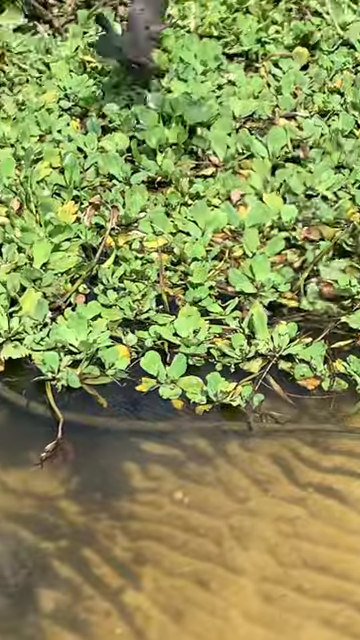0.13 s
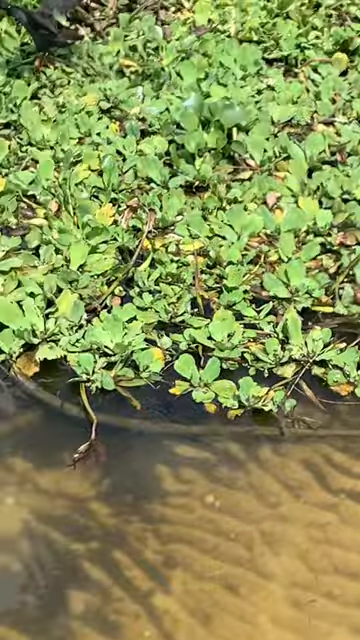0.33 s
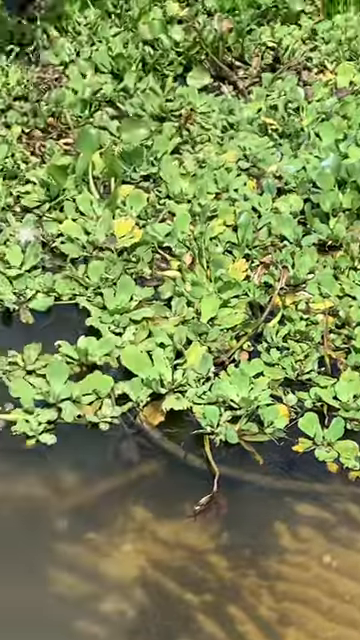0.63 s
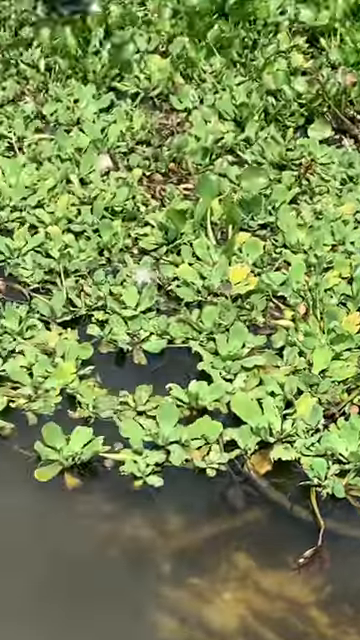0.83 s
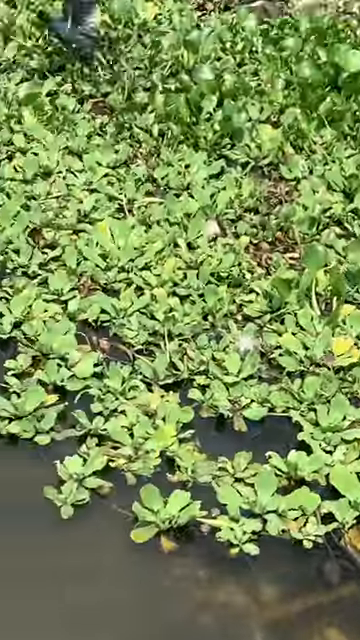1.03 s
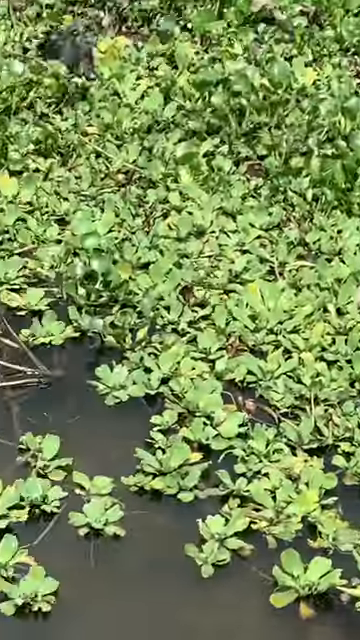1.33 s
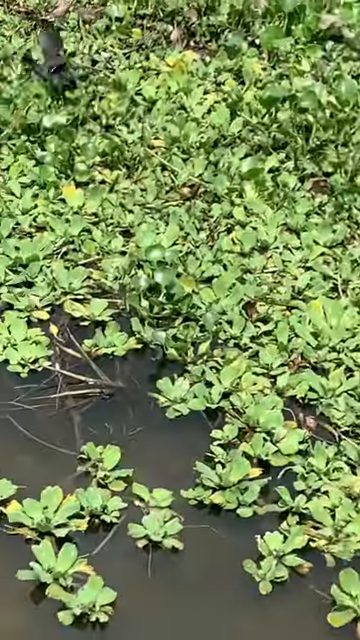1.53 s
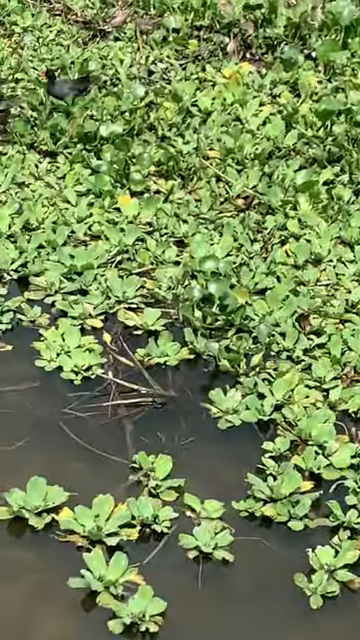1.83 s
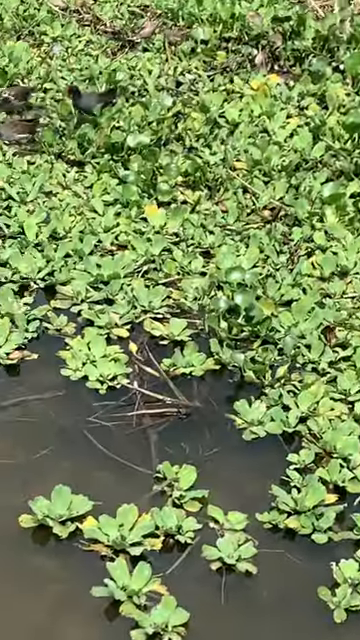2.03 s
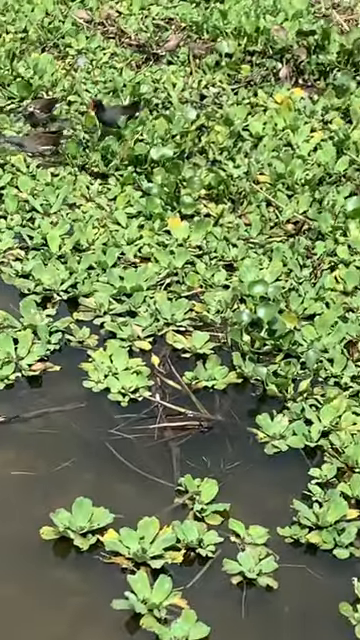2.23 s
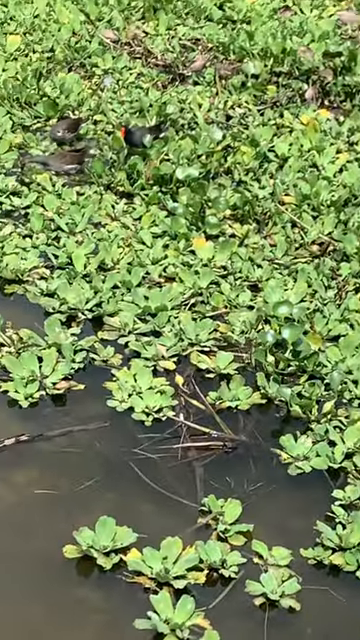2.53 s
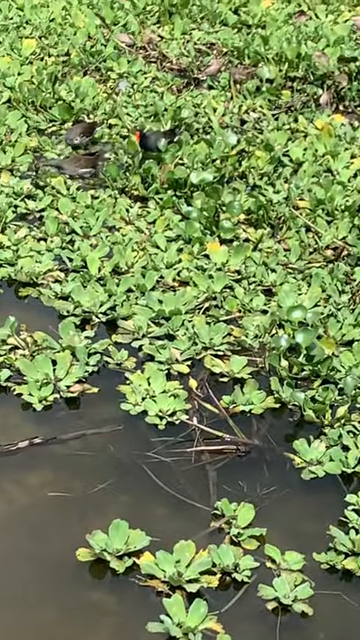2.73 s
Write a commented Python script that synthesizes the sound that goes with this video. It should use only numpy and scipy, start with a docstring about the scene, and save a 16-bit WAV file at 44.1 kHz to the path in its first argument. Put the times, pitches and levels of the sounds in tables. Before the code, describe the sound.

A moorhen gives about eight short, falling, nasal clucks, then four harsh squawks, mostly stuttering. Two tiny leaf snaps and a thin buzz sit between, over low rumble and distant engines; open pond, small stereo microphone.

```python
"""A low rumble cuts in, and at once moorhens on a weedy pond cluck: falling notes built from harmonics.
Then come four harsh squawks, all but one broken into stuttering bursts of voice and hiss.
Leaves snap twice (short noise clicks), a thin pulsed buzz comes and goes, a small bird whistles faintly.
Two distant engines, made of a few low tones each, drone underneath; one of them gains speed overall."""
import sys
import numpy as np
from scipy import signal
from scipy.fft import rfft, irfft, next_fast_len
from scipy.io import wavfile
from scipy.ndimage import map_coordinates

SR = 44100
rng = np.random.default_rng(int(sys.argv[2]) if len(sys.argv) > 2 else 0)


def put_to_file(sound):
    """Save the sound as 16-bit audio at rate SR, in the file named by the first command-line argument."""
    columns = np.atleast_2d(sound).T  # one column per channel
    safe = np.clip(columns, -1, 1)
    whole_steps = np.round(safe * 32767)
    wavfile.write(sys.argv[1], SR, whole_steps.astype(np.int16))


N = 127890

# Clucks: start_s, length_s, starting pitch_hz, fall (share of pitch), starting level_db,
# third_harmonic_db, upper_harmonics_db, rasp_db
CLUCKS = [(0.091, 0.033, 787.6, 0.22, -20, -20.5, -20.5, -31),
          (0.264, 0.038, 768.6, 0.197, -19.5, -27, -21.5, -31),
          (0.473, .041, 711, 0.198, -26.5, -14, -16, -32.5),
          (.675, 0.0068, 637.4, .1, -38.5, -22, -8.5, -55), (.71, 0.054, 722, 0.171, -29, -9, -10, -33.5),
          (0.925, 0.052, 715, 0.184, -32, -3.5, -9, -47), (1.186, .025, 659, 0.23, -34, -16, -13, -40.5),
          (1.416, 0.068, 751.6, 0.25, -28.5, -2, -2.5, -41)]
CLUCK_ATTACK_S, CLUCK_RELEASE_S, CLUCK_FADE_DB_PER_S = .0049, 0.0024, 231
# As a cluck sags, its upper harmonics fade and its pitch gets shakier
SAG_POWER, SAG_S, UPPER_FADE_DB, TAIL_FRAY = 3.2, .04, 6, 3
FUNDAMENTAL_DB = -17  # compared with the second harmonic
BREATH_DB = -11  # breath noise, compared with the upper harmonics
# Random unsteadiness: pitch (share), level (dB), upper-harmonic phase (radians per harmonic number)
CLUCK_JITTER, CLUCK_SHIMMER_DB, CLUCK_SMEAR = .003, 1.0, .075
# Tone colour of a cluck's upper harmonics and breath: frequency_hz, level_db
UPPER = [(2900, -2.5), (3600, -7), (4300, -18), (5000, -6.5), (7000, -28.5), (9000, -18), (10100, -14.5),
         (15000, -38.5)]
# Tone colour of the rasp: frequency_hz, level_db
RASP = [(400, -37), (750, -17.5), (1300, -7), (1650, -13), (1950, -19.5), (4500, -37.5), (15000, -45)]
# The rasp builds up before a cluck, drops as the note starts, and returns around its end
RASP_LEAD_S, RASP_LEAD_DB, RASP_TAIL_S, RASP_UNDER_DB = 0.026, -2.5, 0.0089, -22
# The throat rings briefly around the moment a cluck breaks off; level compared with the rasp
THROAT_HZ, THROAT_DB, THROAT_S = 1592, -0.5, 0.0029

# Throat setting of each squawk: middle_s, pitch_hz, bill_resonance_hz, bill_boost_db, low_body_db,
# noise_share (0 to 1)
SQUAWKS = [(1.88, 737.6, 2800, 5, -0.5, 0.2), (2.23, 1058, 4200, 6.5, 2, 0.2),
           (2.61, 653, 3800, 2, 2.5, 0.2), (2.75, 736, 3900, 8, 5.5, 0.23)]
# Tone colour of the open bill: frequency_hz, level_db
HARSH = [(700, 1), (1450, -6), (1800, -23.5), (2200, -6.5), (3000, 0.5), (3600, -7), (4300, -0.5),
         (5300, -3), (6100, -21), (7100, -20), (9000, -14), (11500, -22), (15000, -26.5)]
# Bursts that make up the squawks: start_s, length_s, level_db
BURSTS = [(1.862, .027, -33), (1.893, .0096, -35), (2.238, 0.019, -37.5), (2.59, .006, -32.5),
          (2.601, .011, -30.5), (2.612, 0.0093, -31), (2.626, 0.0087, -33), (2.713, .005, -37),
          (2.732, 0.0055, -39), (2.737, 0.0098, -30.5), (2.748, .01, -30.5), (2.758, .02, -29),
          (2.78, .0096, -29.5)]
SQUAWK_SPAN_S = .06  # bursts starting this near a squawk's middle belong to it
SQUAWK_EDGE_S, BILL_WIDTH_HZ, BODY_HZ, SQUAWK_JITTER = 0.0037, 600, 1100, .01
# Air hissing through the bill around each burst; level compared with the burst
SQUAWK_HISS_DB, SQUAWK_HISS_LEAD_S, SQUAWK_HISS_TAIL_S = -11.5, 0.027, 0.0089

# Leaf snaps: start_s, level_db
SNAPS = [(1.0893, -33), (1.1288, -24)]
# Tone colour of the snaps: frequency_hz, level_db
SNAP_COLOUR = [(800, -12), (4500, -1), (12700, 1), (15000, -7)]
SNAP_DECAY_S, SNAP_TAIL_DB, SNAP_TAIL_S = .001, -20, .008

# Swells of the rattle: peak_s, rise_s, fall_s, level_db before pulsing, average pulses_per_s
RATTLES = [(0.284, 0.067, 0.064, -47.5, 104), (.47, 0.095, 0.1, -59, 32), (0.757, 0.084, 0.071, -51.5, 60),
           (1.16, 0.14, 0.08, -56, 55), (1.39, 0.12, 0.15, -55.5, 45)]
# Tone colour of the rattle: frequency_hz, level_db
RATTLE_COLOUR = [(2000, -6.5), (3750, 9), (5000, 1.5), (8500, -1), (15000, -6)]
# Path of the whistle and the chirp after it, before random wavering: time_s, pitch_hz, level_db
WHISTLE = [(2.15, 3900, -59), (2.174, 5150, -63), (2.2, 6250, -76), (2.226, 6500, -75), (2.238, 2600, -47)]

# Nearer engine: time_s, firing_rate_hz, level_db
ENGINE = [(0, 56.75, -47), (.32, 59.19, -29.5), (.76, 66.52, -30), (1.06, 71.67, -29), (1.45, 69.08, -30),
          (2.14, 72.41, -27), (2.9, 76.7, -27)]
# Its tones: multiple (of the firing rate), level_db
ENGINE_ORDERS = [(1, -0.5), (2, -2.5), (3, -16), (4, -23.5)]
# Farther engine: time_s, cycle_rate_hz, level_db
DRONE = [(0, 19.6, -30), (1.1, 20.66, -34), (2.1, 19.9, -33.5), (2.9, 20.2, -30.5)]
# Its tones: multiple (of the cycle rate), level_db
DRONE_ORDERS = [(3, -3), (5, -7), (6, -3), (7, -8.5), (8, -5.5), (9, -9.5)]
# Tone colour of the low rumble: frequency_hz, level_db
RUMBLE = [(35, -25), (50, 0.5), (85, -3.5), (112, 2), (165, -2), (215, -4.5), (250, -16.5), (295, -10),
          (380, -19), (1500, -59.5)]
# Tone colour of the open air: frequency_hz, level_db
AIR = [(780, 5), (1300, -5.5), (4000, -21.5), (6000, -31), (15000, -51.5)]
RUMBLE_DB, AIR_DB = -32, -42.5
ECHO_DB, ECHO_T60_S = -26, .2  # T60: time for the echo to fade by 60 dB

# Stereo image, alike for every source: frequency_hz, left_lead_radians
STEREO_PHASE = [(0, 0), (250, -.3), (550, -1.5), (1000, -1.7), (2600, 1.6), (3400, .5), (4500, 2.9),
                (5600, 4.2), (6300, 6.28), (7550, 6.28), (8500, 9.2), (11500, 12.7), (14600, 18.8)]
# frequency_hz, left_over_right_db
STEREO_BALANCE = [(50, 2), (330, 6), (650, -0.2), (1550, -1.5), (2000, -5.5), (3500, 0.5)]
TOP_HZ = 15950  # nothing sounds above this


def amp(db):
    """Turn decibels into a gain."""
    return 10 ** (np.asarray(db) / 20)


def unit(x):
    """Scale to an average (rms) level of 1."""
    return x / np.sqrt(np.mean(x ** 2) + 1e-20)


def along(points, hz):
    """Read (Hz, value) points, joined by lines on a log frequency axis."""
    f, v = np.transpose(points)
    return np.interp(np.log(hz + 1), np.log(f + 1), v)


def clock():
    """The time of every sample, in seconds."""
    return np.arange(N) / SR


def curves(rows):
    """One value per sample for each column after the time."""
    s, *cols = np.transpose(rows)
    return [np.interp(clock(), s, c) for c in cols]


def wobble(rate):
    """A smooth random curve through this many random points a second."""
    points = rng.standard_normal(int(N * rate / SR) + 4)
    return map_coordinates(points, [np.arange(N) * rate / SR])


def filtered(x, response):
    """Shape x by a gain (real or complex) that depends on frequency."""
    m = next_fast_len(N + SR // 2)
    spectrum = rfft(x, m) * response(np.fft.rfftfreq(m, 1 / SR))
    return irfft(spectrum, m)[..., :N]


def noise(colour):
    """Noise with the given tone colour, at rms 1."""
    return unit(filtered(rng.standard_normal(N), lambda hz: amp(along(colour, hz))))


def gate(t, length, attack, release):
    """A smooth rise, hold and fall."""
    ramp = np.clip(np.minimum(t / attack, (length - t) / release), 0, 1)
    return np.sin(np.pi / 2 * ramp) ** 2


def clucks(flutter_db=3):
    """Falling notes led by the second harmonic; the voice rasps as it starts and as it breaks off."""
    out, rasp, now = np.zeros(N), np.zeros(N), clock()
    waver, shake, breath = wobble(700), wobble(300), noise(UPPER)
    flutter = [wobble(90.16) for k in range(20)]  # level changes of each harmonic
    blur = [wobble(500) for k in range(20)]  # phase changes of each harmonic
    for start, length, hz, fall, db, third_db, upper_db, rasp_db in CLUCKS:
        on = (now >= start - CLUCK_ATTACK_S / 2) & (now < start + length)
        t = now[on] - start
        u = np.clip(t / length, 0, 1)
        sag = u ** (SAG_POWER * SAG_S / length)  # short clucks drop late, long ones more evenly
        jitter = CLUCK_JITTER * (1 + TAIL_FRAY * sag) * waver[on]
        pitch = hz * (1 - fall * sag) * (1 + jitter)
        phase = 2 * np.pi * np.cumsum(pitch) / SR
        effort = np.abs(np.sin(np.pi * u)) ** .5  # strongest mid-note

        first = amp(FUNDAMENTAL_DB) * np.sin(phase)
        second = np.sin(2 * phase)
        third = amp(third_db + CLUCK_SHIMMER_DB * flutter[3][on]) * np.sin(3 * phase)
        voice = (1 + effort) / 2 * (first + second + third)
        for k in range(4, 20):
            level_db = upper_db + along(UPPER, k * pitch) - UPPER_FADE_DB * sag + flutter_db * flutter[k][on]
            smeared = k * (phase + CLUCK_SMEAR * blur[k][on]) + rng.uniform(0, 2 * np.pi)
            voice += effort * amp(level_db) * np.sin(smeared)
        voice += effort * amp(upper_db + BREATH_DB) * breath[on]

        half = CLUCK_ATTACK_S / 2  # the attack begins this early
        shape = gate(t + half, length + half, CLUCK_ATTACK_S, CLUCK_RELEASE_S)
        fading_db = db - CLUCK_FADE_DB_PER_S * length * sag + CLUCK_SHIMMER_DB * shake[on]
        out[on] += np.sqrt(2) * voice * shape * amp(fading_db)

        after = now - start - length
        ring = np.exp(-(after / THROAT_S) ** 2) * np.sin(2 * np.pi * THROAT_HZ * after)
        out += amp(rasp_db + THROAT_DB) * ring
        lead = amp(RASP_LEAD_DB) * np.exp(-np.abs(now - start) / RASP_LEAD_S)
        lead *= np.where(now > start, amp(RASP_UNDER_DB), 1)
        rasp += amp(rasp_db) * (lead + np.exp(-np.abs(after) / RASP_TAIL_S))
    return out + rasp * noise(RASP)


def squawk(middle, hz, bill_hz, bill_db, body_db, noise_share, arch=0.034):
    """A pressed voice through the open bill in short arched bursts, with hiss around and on every cycle."""
    out, around, now = np.zeros(N), np.zeros(N), clock()

    def colour(f):
        """Gain of the open bill, with its resonance and low body."""
        bill = bill_db * np.exp(-((f - bill_hz) / BILL_WIDTH_HZ) ** 2)
        body = body_db * np.exp(-(f / BODY_HZ) ** 2)
        return amp(along(HARSH, f) + bill + body)

    waver, hiss = wobble(900), unit(filtered(rng.standard_normal(N), colour))
    for start, length, db in BURSTS:
        if abs(start - middle) >= SQUAWK_SPAN_S:
            continue
        on = (now >= start) & (now < start + length)
        t = now[on] - start
        bend = arch * (np.sin(np.pi * t / length) - 2 / np.pi)  # pitch rises, then falls
        pitch = hz * (1 + bend + SQUAWK_JITTER * waver[on])
        phase = 2 * np.pi * np.cumsum(pitch) / SR
        voice = np.zeros(len(t))
        for k in range(1, int(TOP_HZ / hz) + 1):
            voice += colour(k * hz) * np.sin(k * phase + rng.uniform(0, 2 * np.pi))
        breathy = unit(hiss[on] * (1 + np.cos(phase) / 2))  # hiss pulses with each cycle
        mix = np.sqrt(1 - noise_share) * unit(voice) + np.sqrt(noise_share) * breathy
        out[on] += amp(db) * gate(t, length, SQUAWK_EDGE_S, SQUAWK_EDGE_S) * mix

        before = (start - now) / SQUAWK_HISS_LEAD_S
        after = (now - start - length) / SQUAWK_HISS_TAIL_S
        away = np.maximum(np.maximum(before, after), 0)
        around = np.maximum(around, amp(db + SQUAWK_HISS_DB) * np.exp(-away))
    return out + around * amp(3 * wobble(270)) * hiss


def snaps():
    """Floating leaves snap: a sharp crack of noise and a short, softer rustle."""
    shape = np.zeros(N)
    for s, db in SNAPS:
        t = np.abs(clock() - s)
        crack = np.exp(-t / SNAP_DECAY_S)
        rustle = amp(SNAP_TAIL_DB) * np.exp(-t / SNAP_TAIL_S)
        shape += amp(db) * (clock() >= s) * (crack + rustle)
    return shape * noise(SNAP_COLOUR)


def rattle(depth_db=5, uneven=0.049):
    """A thin buzz, perhaps an insect: noise pulsing at an uneven rate, that swells and fades."""
    shape, drift = np.zeros(N), 1 + uneven * wobble(25)
    for s, rise, fall, db, rate in RATTLES:
        t = clock() - s
        beat = np.cos(2 * np.pi * rate * np.cumsum(drift) / SR)
        swell = np.exp(-(t / np.where(t < 0, rise, fall)) ** 2)
        shape += amp(db + depth_db * (beat + 0.5)) * swell
    return shape * noise(RATTLE_COLOUR)


def whistle(octave_db=-73):
    """A small bird's faint, broken upward slur, then the brief falling chirp that opens the second squawk."""
    hz, db = curves(WHISTLE)
    phase = 2 * np.pi * np.cumsum(hz * (1 + .012 * wobble(1200))) / SR
    start, end = WHISTLE[0][0], WHISTLE[-1][0]
    shape = gate(clock() - start, end - start, 0.0046, 0.0035)
    main = amp(4 * wobble(170)) * np.sin(phase)
    octave = amp(4 * wobble(170)) * np.sin(2 * phase)
    return shape * (amp(db) * main + amp(octave_db) * octave)


def engine(run, orders, waver_db):
    """Only the low tones of an exhaust carry this far; each wavers in level."""
    hz, db = curves(run)
    phase = 2 * np.pi * np.cumsum(hz) / SR
    out = np.zeros(N)
    for k, level in orders:
        gain = amp(db + level + waver_db * wobble(5.058))
        out += gain * np.sin(round(k) * phase + rng.uniform(0, 2 * np.pi))
    return np.sqrt(2) * out


def banks(x):
    """A scattered echo from the banks: the sound smeared by a tail of fading noise."""
    t = np.arange(SR // 2) / SR
    tail = rng.standard_normal(len(t)) * amp(-60 * t / ECHO_T60_S)
    return signal.fftconvolve(x, tail / np.linalg.norm(tail))[:N]


def scene():
    """Birds in front, engines far off, open air all round."""
    birds = clucks() + sum(squawk(*row) for row in SQUAWKS)
    echo = amp(ECHO_DB) * banks(birds)
    small_sounds = snaps() + rattle() + whistle()
    engines = engine(ENGINE, ENGINE_ORDERS, waver_db=0.45) + engine(DRONE, DRONE_ORDERS, waver_db=4.5)
    background = amp(RUMBLE_DB) * noise(RUMBLE) + amp(AIR_DB) * noise(AIR)
    mono = birds + echo + small_sounds + engines + background
    return np.array([mono, mono])


def record(dry):
    """The sound cuts in after a moment, is spread between the ears by frequency and loses its very top."""
    start_s = .032
    side = np.array([[.5], [-.5]])  # left and right each take half the difference

    def image(hz):
        """Level and phase of each ear, with the top cut off."""
        balance = amp(side * along(STEREO_BALANCE, hz))
        turn = np.exp(1j * side * np.interp(hz, *np.transpose(STEREO_PHASE)))
        return balance * turn * (hz < TOP_HZ)

    return filtered(dry * (clock() > start_s), image)


dry = scene()
out = record(dry)
put_to_file(out)
```